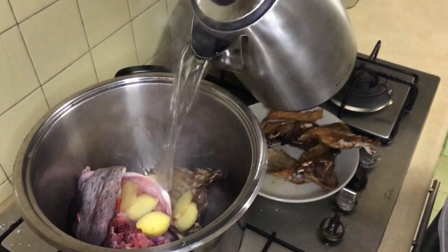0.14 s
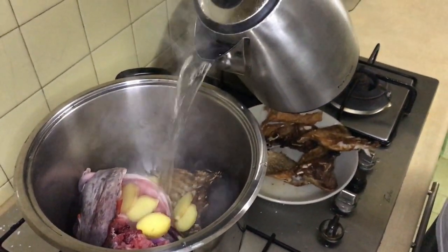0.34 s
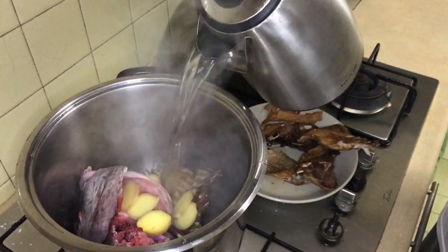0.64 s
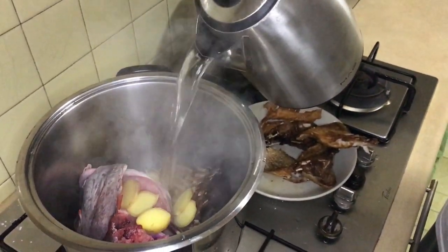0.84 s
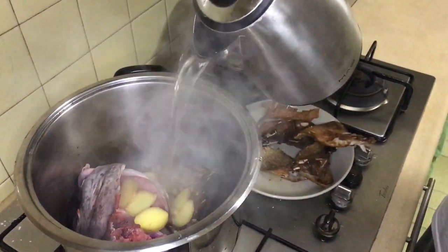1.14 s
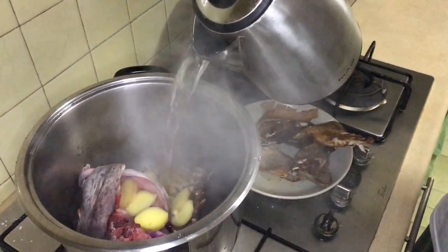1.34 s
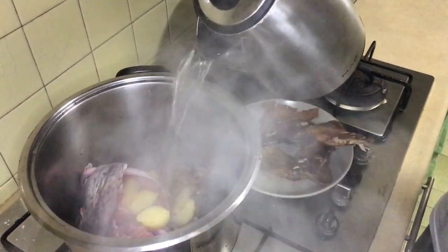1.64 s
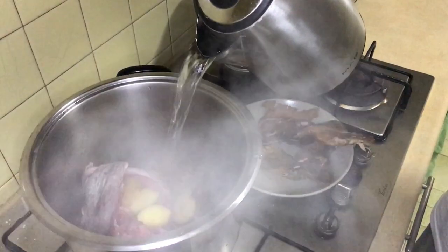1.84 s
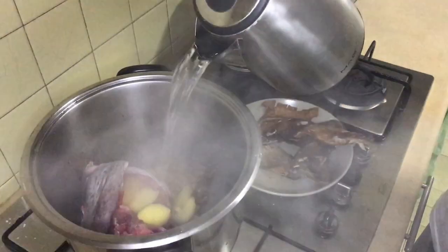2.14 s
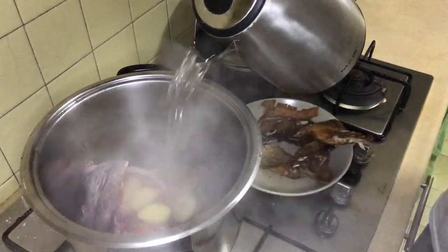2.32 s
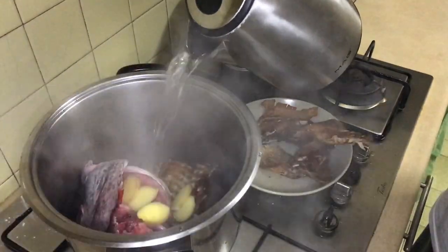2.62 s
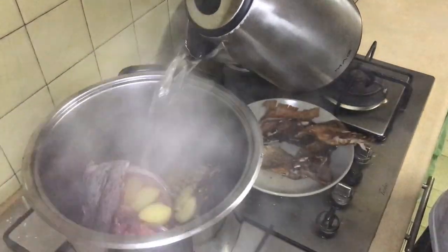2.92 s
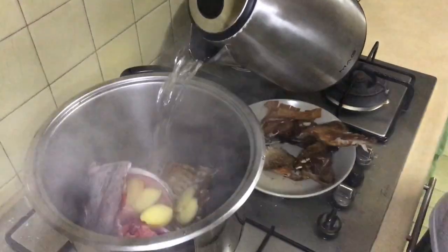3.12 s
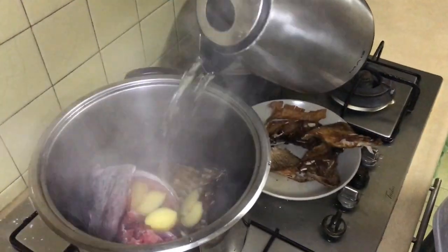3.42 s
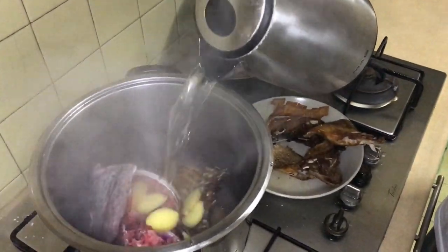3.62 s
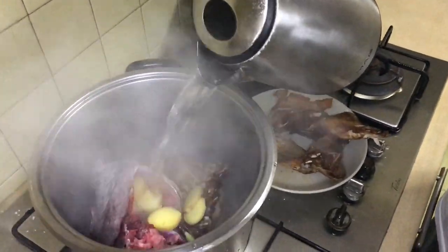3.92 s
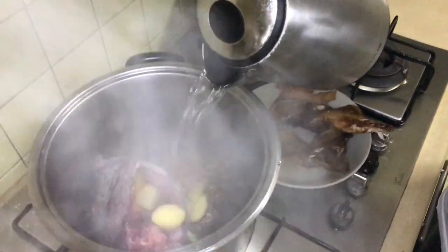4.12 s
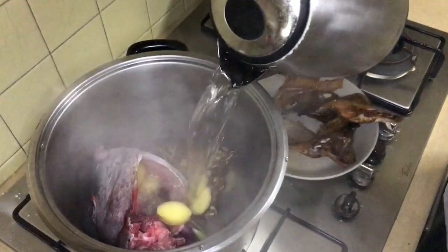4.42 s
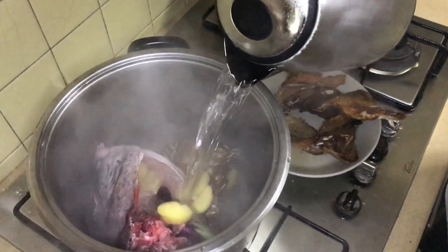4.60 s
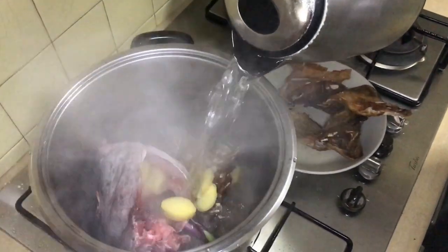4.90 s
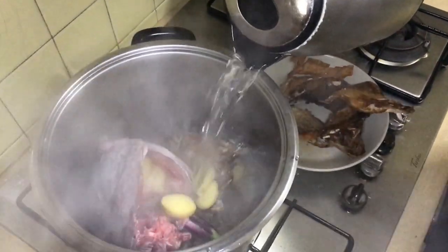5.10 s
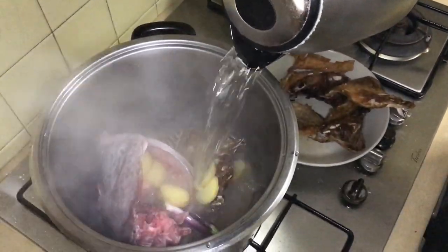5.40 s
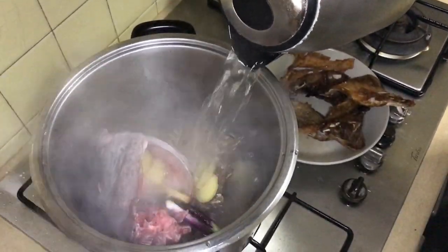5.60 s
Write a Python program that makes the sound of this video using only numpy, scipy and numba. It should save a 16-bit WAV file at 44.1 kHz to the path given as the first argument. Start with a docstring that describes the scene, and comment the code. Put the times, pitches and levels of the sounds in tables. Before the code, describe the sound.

Hot water pours from a kettle into a steel pot, splashing, pattering and gurgling over a faint steam hiss.

```python
"""A kitchen, close up: hot water pours from a kettle into a steel pot holding meat and potatoes.
The stream breaks into drops that patter and spray, drums for a second on the bare steel, then
gurgles and plops as trapped air rings in the rising pool. The pot rings faintly along with it;
a steady hiss of steam and a low room rumble lie underneath."""
import sys
import numpy as np
from scipy import signal
from scipy.fft import rfft, irfft
from scipy.io import wavfile
from scipy.ndimage import uniform_filter1d
from numba import njit

SR = 44100
rng = np.random.default_rng(int(sys.argv[2]) if len(sys.argv) > 2 else 0)


def to_wav(s):
    """Save 16-bit WAV."""
    ch = np.atleast_2d(s).T  # columns
    pcm = np.round(np.clip(ch, -1, 1) * 32767)  # PCM
    wavfile.write(sys.argv[1], SR, pcm.astype(np.int16))


N = 253575


def undb(db):
    return 10 ** (np.asarray(db) / 20)


def level(x, db):
    """Set the rms level."""
    return x * undb(db) / np.sqrt(np.mean(x ** 2))


def curves(t, table):
    """One automation curve for each column after the time."""
    s, *columns = np.transpose(table)
    return [np.interp(t, s, column) for column in columns]


def band(x, hz, width):
    """A resonance with gain 1 at its centre."""
    return signal.lfilter(*signal.iirpeak(hz, hz / width, SR), x)


@njit
def swept_band(x, hz, width):
    """State-variable band-pass whose centre moves."""
    y, band_state, low_state = np.empty(len(x)), 0., 0.
    for i in range(len(x)):
        g, damping = np.tan(np.pi * hz[i] / SR), width / hz[i]
        v = (band_state + g * (x[i] - low_state)) / (1 + g * (g + damping))
        band_state, low_state = 2 * v - band_state, low_state + 2 * g * v
        y[i] = damping * v
    return y


def colour(x, table):
    """Minimum-phase EQ through (f/Hz, gain/dB) points."""
    hz, db = np.transpose(table)
    bin_hz = np.fft.rfftfreq(2048, 1 / SR)
    log_gain = np.interp(np.log(bin_hz + 1), np.log(hz), db) * np.log(10) / 20
    cepstrum = irfft(log_gain) * np.r_[1, 2 * np.ones(1023), 1, np.zeros(1023)]
    return signal.fftconvolve(x, irfft(np.exp(rfft(cepstrum))))[:N]


def walk(rate):
    """Random modulator: a new value every 1 / rate s, slewed; spread 1."""
    hold = int(SR / rate)
    steps = np.repeat(rng.standard_normal(N // 50), hold)[:N]
    slewed = uniform_filter1d(steps, hold)
    return slewed / slewed.std()


@njit
def grains(at, hz, cycles, size, glide, rise):
    """Damped tones with an attack of `rise` cycles; pitch glides up as a bubble nears the surface."""
    out = np.zeros(N)
    for k in range(len(at)):
        decay = np.exp(-2 * hz[k] / (cycles[k] * SR))
        attack = np.exp(-hz[k] / (rise * SR))
        bend = 1 + glide * (1 - decay)
        step = 2 * np.pi * hz[k] / SR
        phase, amp, muted, i = 0., size[k], 1., int(at[k])
        while amp > .003 * size[k] and i < N:
            out[i] += amp * (1 - muted) * np.sin(phase)
            phase, step = phase + step, min(step * bend, 2.8)
            amp, muted = amp * decay, muted * attack
            i += 1
    return out


def shower(count, hz, octaves, cycles, scatter_db, glide):
    """A cloud of grains around a centre pitch, most small and a few larger; rms near 1 throughout."""
    when, pitch, weight, length = rng.random((count, 4)).T
    at = (when * N).astype(np.int64)
    hz = np.minimum(np.broadcast_to(hz, N)[at] * 2 ** (octaves * (pitch - .5)), .4 * SR)
    db = np.broadcast_to(scatter_db, N)[at] * np.minimum(-np.log(1 - weight), 4.5)
    cloud = grains(at, hz, cycles * (.5 + length), undb(db) * np.sqrt(hz), glide, rise=.25)
    return cloud / np.sqrt(uniform_filter1d(cloud ** 2, SR // 2) + 1e-12)


# EQ of the patter, shared by steam and drop spray: f/Hz, gain/dB
WATER_EQ = [(300, -28.5), (390, 0.5), (613, 0.5), (959, -3.5), (1320, -5.5), (1650, -0.5), (2200, 2.5),
            (4380, 4.5), (10600, -1.5), (14500, -3.5), (16000, 3)]
# the air in the pot: t/s, resonance f/Hz, its level/dB against the patter, notch f/Hz
POT_AIR = [(0, 4400, -21, 1870), (.58, 4200, -12.5, 1780), (.75, 4440, -9, 3800), (1.3, 4070, -11.5, 3160),
           (1.598, 4420, -17.5, 1890), (2.5, 4260, -18, 3650), (3.6, 4130, -15.5, 3800),
           (4.1, 3800, -26, 2220), (4.3, 4460, -12, 2340), (4.5, 3860, -25, 2330), (4.95, 3480, -14, 2360),
           (5.1, 3800, -20, 1910), (5.4, 3560, -17.5, 1620), (5.6, 3120, -9.5, 1610),
           (5.75, 3320, -17, 1600)]


def patter(t, torn, hiss, droplet_hz):
    """Tiny impacts and ringing droplets, coloured by the hollow of the pot."""
    drips = shower(count=12000, hz=2700, octaves=3.535, cycles=7., scatter_db=3.4 * torn, glide=.059)
    droplets = shower(count=5000, hz=droplet_hz, octaves=.54, cycles=1.66,
                      scatter_db=6.8 * torn, glide=.019)
    droplets += level(swept_band(hiss, droplet_hz, width=520.), -1)  # the hollow rings with them
    wash = level(colour(drips + .47 * hiss, WATER_EQ), -3) + undb(-11.5 - 4 * torn) * droplets
    air_hz, air_db, notch_hz = curves(t, POT_AIR)
    air = swept_band(drips + hiss, air_hz, width=1260.)
    air = swept_band(air, air_hz, width=2520.)
    return wash - .4 * swept_band(wash, notch_hz, width=700.) + level(air, air_db)


def gurgle(torn, pocket_hz):
    """Rising bubbles ring the narrow resonance of the air pocket under the stream."""
    bubbles = shower(count=2000, hz=pocket_hz, octaves=.55, cycles=7.1,
                     scatter_db=6.8 * torn, glide=.189)
    return level(swept_band(bubbles, pocket_hz, width=10.5) + .7 * bubbles, -5.5)


def spray(torn, hiss):
    """The finest droplets sizzle at the top end."""
    mist = shower(count=9000, hz=10030, octaves=2.06, cycles=7, scatter_db=6.5 * torn, glide=.01)
    low_cut = signal.butter(2, 7000, "high", fs=SR, output="sos")
    return level(signal.sosfilt(low_cut, mist + .34 * hiss), -.082)


# the stream: t/s, patter level/dB, gurgle and spray level/dB against it, droplet f/Hz, air pocket f/Hz
FLOW = [(0, -39.5, -6, -4.5, 2540, 977), (0.301, -41, -9.5, -18, 2870, 1080),
        (.585, -36.5, -12, -20, 2880, 1050), (.6, -29.5, -4, -23, 2780, 1200),
        (.78, -23.5, -12, -15, 2180, 1210), (.9, -25.5, -6, -18, 1960, 966),
        (1.05, -30.5, -2, -5, 2400, 965), (1.3, -40, -1, -4.5, 2170, 976),
        (1.6, -38.5, 1.5, -2.5, 1700, 958), (1.7, -44.5, -5.5, -10, 1680, 974),
        (2.45, -45.5, -2, -4, 2600, 1033), (3.0, -34.5, -3.5, -19, 1790, 1070),
        (3.2, -45, -9, -11, 1710, 1050), (3.4, -34.5, -1.5, -16, 1800, 1117),
        (3.75, -41, -15, -5.5, 2350, 1064), (4.0, -38.5, -13, -15, 1690, 737),
        (4.3, -38.5, -6.5, -11.5, 1860, 826), (4.43, -39.5, -4, -13, 1860, 815),
        (4.55, -37.5, -10.5, -19, 1680, 751), (4.7, -36.5, -6.5, -11.5, 1570, 674),
        (4.98, -36, -32, -14.5, 1750, 920), (5.1, -41.5, -3, -11.5, 3100, 935),
        (5.6, -33, -29, -13, 2880, 783), (5.75, -39.5, -9, -4, 3120, 740)]
# how ragged the stream is: t/s, amount (0 whole, 1 torn)
RAGGEDNESS = [(0, 0.35), (.7, 0), (1.6, 0.12), (1.72, 0.73), (2.5, 0.68), (3.6, 0.78), (4.0, 0.51),
              (5.3, 0.84), (5.5, 0.78), (5.75, 0.92)]


def pour(t):
    """The stream's mix: a torn stream falls in clumps of uneven drops, a whole one hisses smoothly."""
    flow_db, gurgle_db, spray_db, droplet_hz, pocket_hz = curves(t, FLOW)
    torn, = curves(t, RAGGEDNESS)
    surge_db = splashes(t)
    clump_db = torn * (1.2 * walk(rate=22) + 3.64 * walk(rate=60))
    hiss = rng.standard_normal(N) * (1.7 - torn)
    impacts = patter(t, torn, hiss, droplet_hz)
    bubbles = gurgle(torn, pocket_hz)
    mist = spray(torn, hiss)
    impacts += churn(t)
    sizzle_db = np.minimum(3.1 * clump_db + 4 * torn * walk(rate=30), 7)
    return undb(flow_db) * (impacts * undb(surge_db + clump_db)
                            + bubbles * undb(gurgle_db + .3 * surge_db + .93 * clump_db)
                            + mist * undb(spray_db + .92 * surge_db + sizzle_db))


def steam():
    """A steady bed of hiss from the steam and the room."""
    return level(colour(rng.standard_normal(N), WATER_EQ), -49.5)


# resonances of the pot, the last row a notch: f/Hz, width/Hz, relative level/dB
POT_RESONANCES = [(613, 23, 0), (735, 10.7, 1), (966, 30, -1.5), (1152, 24, -8.5), (1639, 45, -2),
                  (2710, 180, -8), (4530, 176, -7), (4910, 330, -9)]


def pot_ring(stream):
    """The pot rings faintly with the water that falls into it."""
    *rings, notch = [undb(db) * band(stream, hz, width) for hz, width, db in POT_RESONANCES]
    return undb(.5) * (sum(rings) - notch)


# EQ of the room tone: f/Hz, gain/dB
RUMBLE_EQ = [(15, -14), (25, -3.5), (59, 4.5), (102, -2.5), (194, 1), (253, -9.5), (418, -8.5), (487, -12),
             (700, -12), (910, -53), (1540, -120)]
# slow rise of the room tone: t/s, level/dB
RUMBLE_LEVEL = [(0, -48), (1.9, -48), (2.5, -46), (4, -47), (5.75, -46)]
# dull thumps, perhaps steam on the microphone: t/s, level/dB, f/Hz
LOW_THUMPS = [(2.122, -31, 44.6), (2.26, -35, 44), (4.32, -31.5, 106), (4.733, -26.5, 168),
              (5.279, -27, 38.7), (5.571, -23.5, 120), (5.652, -31, 126)]


def rumble(t):
    """Wavering low room tone, a faint mains hum and a few thumps."""
    s, db, hz = np.transpose(LOW_THUMPS)
    thumps = grains(s * SR, hz, np.full(len(s), 2.5), undb(db), glide=0., rise=.03)
    tone_db = curves(t, RUMBLE_LEVEL)[0] + 2.66 * walk(rate=9.3)
    hum = level(band(rng.standard_normal(N), hz=100.6, width=4.8), -55)
    return level(colour(rng.standard_normal(N), RUMBLE_EQ), tone_db) + hum + thumps


# heavier slugs of water landing at once: t/s, boost/dB, hold/s
SLUGS = [(0.245, 4, 0.0079), (.758, 1, 0.024), (.888, 3, 0.031), (2.273, -3, 0.028), (2.508, 4, 0.0074),
         (2.553, 4, 0.067), (2.696, 8, 0.012), (2.76, 7, 0.026), (2.962, 0, 0.022), (3.021, 6, 0.071),
         (3.107, 2, 0.023), (3.206, 12, 0.01), (3.262, 5.5, 0.061), (3.333, 10, 0.015), (3.379, 5.5, 0.073),
         (3.586, 6, 0.0089), (3.89, 3, 0.049), (4.195, 4, 0.024), (4.241, 8, 0.048), (5.02, 5, 0.016),
         (5.136, 6.5, 0.025), (5.408, 7.5, 0.0084)]
# short breaks in the stream: t/s, cut/dB, hold/s
STREAM_BREAKS = [(2.53, 5, 0.0099), (2.65, 7, 0.036), (2.93, 7, 0.026), (3.155, 2, 0.022),
                 (3.228, 0, 0.024), (3.64, 2, 0.044), (4.355, 5, 0.028), (4.41, 6, 0.038), (4.49, 3, 0.028),
                 (4.698, 6, 0.018), (4.865, 0, 0.022), (5.07, 4, 0.052), (5.36, 0.5, 0.072),
                 (5.705, 7, 0.019)]


def splashes(t):
    """Gain ride in dB: a slug hits fast and lets go; a break fades out and ends as water lands again."""
    def envelope(rows, attack, release):
        return np.max([np.interp(t, [s - attack, s, s + hold, s + hold + release], [0, db, db, 0])
                       for s, db, hold in rows], axis=0)
    fast_s, slow_s = .0022, .018
    return envelope(SLUGS, fast_s, slow_s) - envelope(STREAM_BREAKS, slow_s, fast_s)


# single drops and slaps: t/s, level/dB, f/Hz
DROP_HITS = [(0.247, -19, 2770), (0.4972, -20, 4400), (0.5937, 3, 3220), (0.5963, -14, 3200),
             (0.765, -7, 4850), (0.89, -24, 5360), (0.9037, -10, 4550), (0.973, -12, 5900),
             (1.242, -19, 2640), (1.3824, -18, 4300), (1.449, -26, 3430), (1.742, -24, 4200),
             (1.804, -24, 3800), (1.8388, -23, 3050), (1.9035, -38, 3420), (1.995, -17, 6340),
             (2.003, -23, 5360), (2.1295, -20, 6300), (2.2672, -20, 5650), (2.2744, -22, 6350),
             (2.287, -32, 4760), (2.296, -28, 1890), (2.4755, -24.5, 3800), (2.5007, -13, 5500),
             (2.5133, -14, 4700), (2.515, -23, 2530), (2.572, -13.5, 6300), (2.6026, -21, 4100),
             (2.697, -22, 2100), (2.703, -19, 8150), (2.711, -23, 7050), (2.726, -13, 3420),
             (2.727, -19, 1500), (2.744, -37, 2500), (2.7884, -16.5, 2010), (2.816, -29, 3500),
             (2.841, -30, 1960), (2.896, -22, 2430), (2.9203, -16, 5930), (2.952, -24, 1500),
             (2.9787, -18, 2620), (3.0285, -26, 4500), (3.071, -17, 9800), (3.112, -11, 5870),
             (3.1836, -21, 14900), (3.213, -12.5, 6600), (3.261, -12, 2670), (3.279, -15, 2550),
             (3.2906, -20, 8400), (3.302, -13, 5600), (3.346, -17, 4370), (3.3844, -9, 4050),
             (3.3889, -16, 1663), (3.424, -10, 4070), (3.456, -27, 4030), (3.478, -23, 4300),
             (3.488, -18, 1730), (3.5, -21, 4200), (3.547, -22, 2620), (3.5845, -7.5, 9600),
             (3.623, -14, 3860), (3.682, -24, 2300), (3.7123, -14, 5280), (3.755, -23, 2990),
             (3.7861, -37, 3400), (3.814, -21, 4200), (3.8507, -18.5, 7140), (3.899, -18, 15350),
             (3.911, -24, 2620), (3.935, -25, 2500), (3.982, -18.5, 4450), (4.057, -23, 1570),
             (4.166, -8, 5600), (4.335, -18, 3170), (4.393, -33, 1660), (4.457, -23, 5300),
             (4.517, -32.5, 1610), (4.575, -32, 2900), (4.6037, -23, 3880), (4.6325, -27, 3620),
             (4.774, -18.5, 3900), (4.809, -20, 3410), (4.851, -28, 1640), (4.896, -22, 1500),
             (4.959, -34, 3430), (5.0354, -12.5, 6240), (5.0456, -14.5, 1360), (5.1045, -21.5, 5990),
             (5.125, -22, 3960), (5.1578, -9.5, 3650), (5.1797, -10, 3720), (5.2302, -15, 3270),
             (5.345, -15, 8500), (5.414, -19, 2070), (5.455, -22, 3470), (5.498, -19, 2320),
             (5.508, -24, 2700), (5.542, -22, 4000), (5.548, -22, 3120), (5.5705, -15, 4030),
             (5.5906, -12, 2590), (5.612, -16, 7400), (5.6276, -20, 3100), (5.642, -15, 4900),
             (5.658, -17, 8000), (5.6699, -11, 3300), (5.694, -19, 9100), (5.699, -39, 3020),
             (5.724, -28, 2800)]


def drops():
    """Each drop rings at its own pitch, ticks as it bursts and throws a short spray around that pitch."""
    s, db, hz = np.transpose(DROP_HITS)
    at = (s * SR).astype(np.int64)
    cycles = 3 * (3000 / hz) ** .25  # big, low bubbles ring for more cycles
    rings = grains(at, hz, cycles, undb(db + 5), glide=.02, rise=.9)
    tick_db = db - 14.5 + 13 * np.log2(hz / 4000)  # high drops tick harder
    tick_hz = 4000 * 4 ** rng.random(len(s))
    ticks = grains(at + .6 * SR / hz, tick_hz, np.ones(len(s)), undb(tick_db), glide=0., rise=.3)
    envelope = np.zeros(N)
    envelope[at] = undb(-23 + .5 * db)
    for lag_s in (.001, .007):  # attack and decay of the spray
        envelope = signal.lfilter([1], [1, -np.exp(-1 / (lag_s * SR))], envelope)
    spatter = shower(count=20000, hz=3680, octaves=3.72, cycles=5.4, scatter_db=-1.5, glide=.059)
    spatter = colour(spatter, WATER_EQ)
    latest_drop = np.maximum(np.searchsorted(at, np.arange(N), "right") - 1, 0)
    spatter = level(spatter, -2.1) + level(swept_band(spatter, hz[latest_drop], width=480.), -5)
    return rings + ticks + envelope * spatter / (.0013 * SR)


# air pockets closing: t/s, level/dB, f/Hz, decay/cycles
AIR_PLOPS = [(.5935, -15.5, 1050, 3), (.594, -20, 477, 2.2), (2.551, -35, 1055, 14),
             (2.567, -29.5, 1010, 5.8), (2.612, -37, 1020, 19), (2.707, -33, 1015, 16),
             (2.766, -32, 1120, 12), (2.785, -26.5, 1100, 7.5), (2.952, -52, 1000, 7.7),
             (2.966, -30, 1090, 6.6), (3.011, -27, 1210, 4.6), (3.028, -21, 1080, 8.1),
             (3.071, -17.5, 1040, 9.6), (3.288, -31, 1070, 9.6), (3.342, -27, 1110, 7.3),
             (3.389, -26, 1045, 16), (3.423, -28, 1024, 10), (3.468, -32, 1090, 13),
             (3.488, -24, 1070, 7.6), (3.617, -34.5, 1075, 13), (4.057, -28, 644, 3.2),
             (4.245, -28.5, 940, 6.8), (4.335, -33, 955, 7), (4.394, -34, 467, 5.3), (4.639, -31.5, 554, 4),
             (4.692, -20, 690, 1.7), (4.714, -28.5, 577, 4.1), (4.773, -33, 810, 6.3),
             (5.043, -29, 1270, 3.2), (5.047, -10.5, 880, 1.4)]


def plops():
    """Large bubbles ring for a few low cycles and bend slightly upward."""
    s, db, hz, cycles = np.transpose(AIR_PLOPS)
    return grains(s * SR, hz, cycles, undb(db + 5), glide=.0053, rise=.85)


# pot wall modes: f/Hz, width/Hz, relative level/dB, t/s when the wandering stream drives each best
WALL_MODES = [(409, 29, -11, 0.915), (620, 60, -14.5, 1.04), (962, 22, -5, 1.23), (1156, 20, -0.5, 0.77),
              (1480, 40, -7.5, 1.06), (1580, 150, 0, 0.91), (2180, 150, -11, 0.58), (2340, 68, -1, 1.04),
              (2780, 180, 6, 0.64), (3160, 210, 7.5, 0.76), (3900, 640, 1, 1.14), (4620, 240, -1, 0.68),
              (5340, 330, 7, 0.825), (5820, 210, 1, 0.97)]


def steel_drumming(t):
    """Impacts on bare steel ring the wall: a knock, a swell, then a fade as the pool covers the metal."""
    start_s, peak_s, knock_s, fade_db_per_s = .5945, 1, .004, 16.5
    drum_db = np.interp(t, [start_s, peak_s], [-38, -36.5]) - fade_db_per_s * np.maximum(t - peak_s, 0)
    knock_db = 13 * np.clip(1 - (t - start_s) / knock_s, 0, 1)
    blows = shower(count=30000, hz=1810, octaves=4.7, cycles=3., scatter_db=3., glide=0.)
    blows *= undb(drum_db + knock_db) * (t >= start_s)
    wall = np.zeros(N)
    for hz, width, db, best_s in WALL_MODES:
        flicker_db = 3.5 * walk(rate=14.48)  # each mode comes and goes on its own
        wander_loss_db = np.minimum(6 * ((t - best_s) / .19) ** 2, 12)
        drive = blows * undb(flicker_db - wander_loss_db)
        wall += undb(db) * np.sqrt(50 / width) * band(drive, hz, width)
    return undb(17.5) * wall


def churn(t):
    """Low bubbles fade in as the deeper pool churns."""
    start_s, fade_s = 3.2, .13
    bubbles = shower(count=1500, hz=594, octaves=.62, cycles=8.1, scatter_db=6., glide=.123)
    return bubbles * undb(-28) * np.clip((t - start_s) / fade_s, 0, 1)


def room(x):
    """The direct sound plus a short tiled-kitchen tail."""
    t60_s, predelay_s, wet_db = .46, .004, -10.5
    t = np.arange(SR // 2) / SR
    tail = rng.standard_normal(len(t)) * 1000 ** (-t / t60_s) * (t > predelay_s)
    impulse = level(tail, wet_db) / np.sqrt(len(t))
    impulse[0] = 1
    return signal.fftconvolve(x, impulse)[:N]


def scene():
    """Mono mix: water and pot in the kitchen reverb, over the rumble."""
    t = np.arange(N) / SR
    stream = steam() + pour(t)
    pot = stream + pot_ring(stream) + drops() + plops() + steel_drumming(t)
    return (room(pot) + rumble(t))[None]


def record(dry):
    """The microphone has a dip in the treble and loses the lowest bass; the phone cuts the top."""
    dipped = dry - .74 * band(dry, hz=10430, width=430)
    low_cut = signal.butter(4, 40, "high", fs=SR, output="sos")
    high_cut = signal.ellip(10, .2, 75, 15800, fs=SR, output="sos")
    return signal.sosfilt(high_cut, signal.sosfilt(low_cut, dipped))


dry = scene()
out = record(dry)
to_wav(out)
```